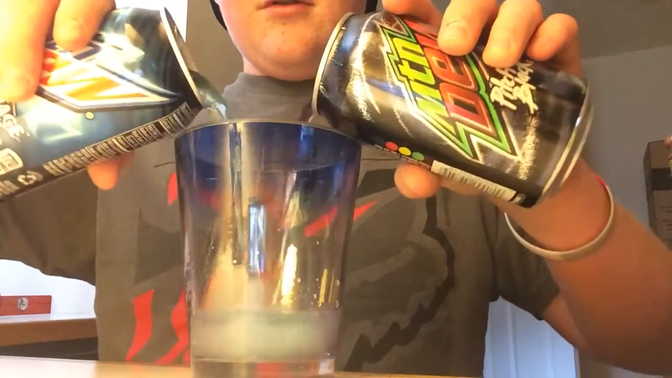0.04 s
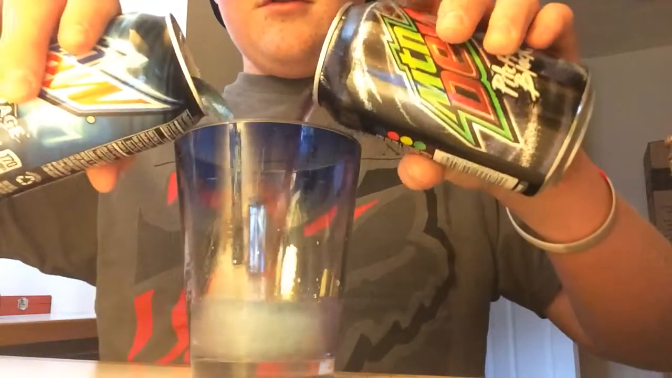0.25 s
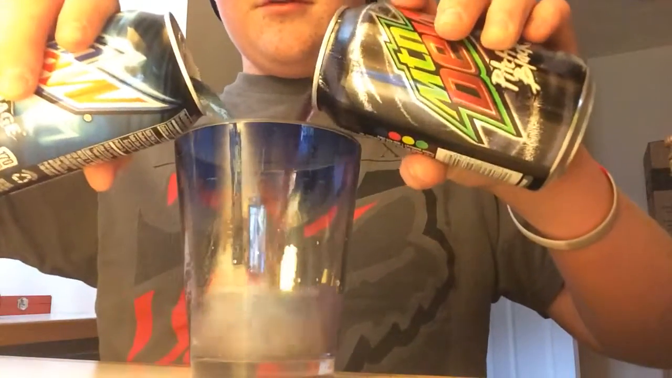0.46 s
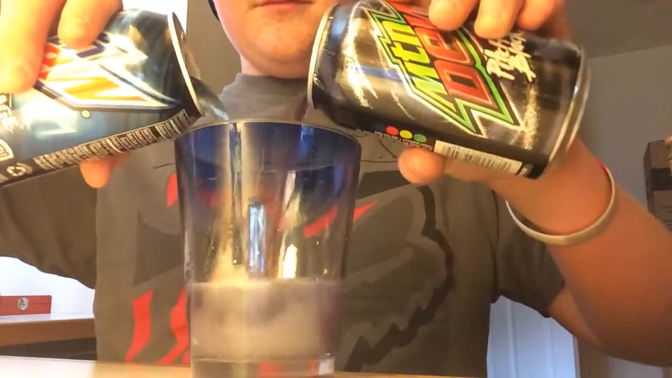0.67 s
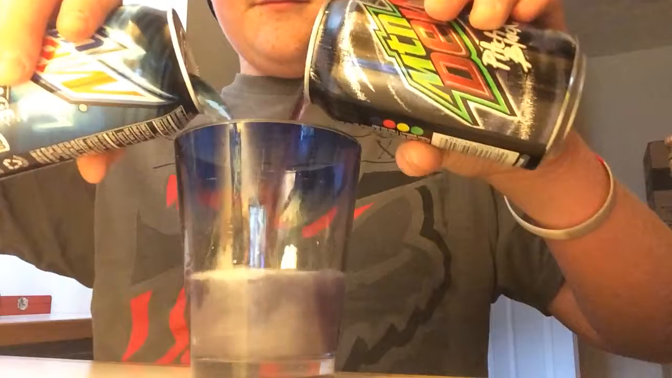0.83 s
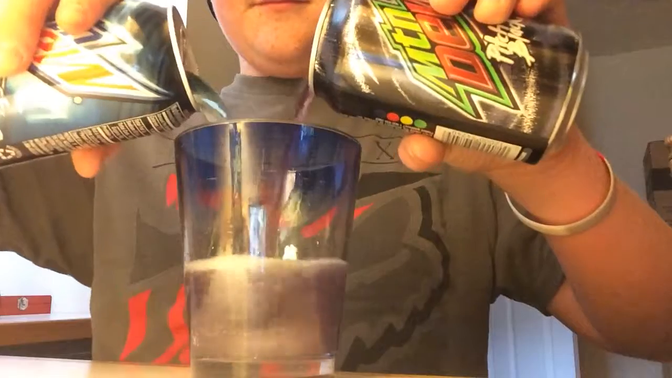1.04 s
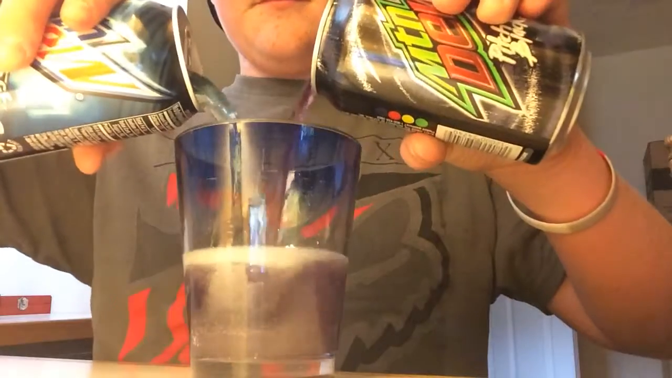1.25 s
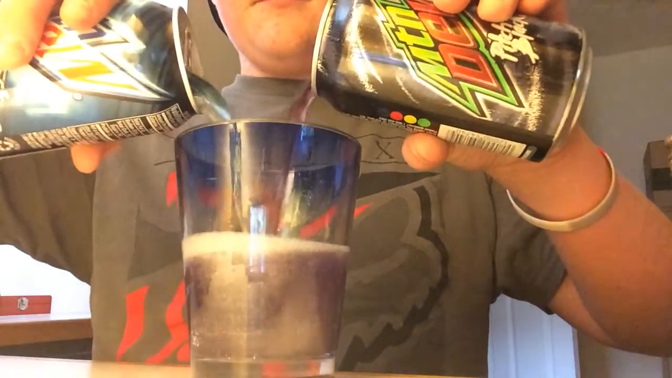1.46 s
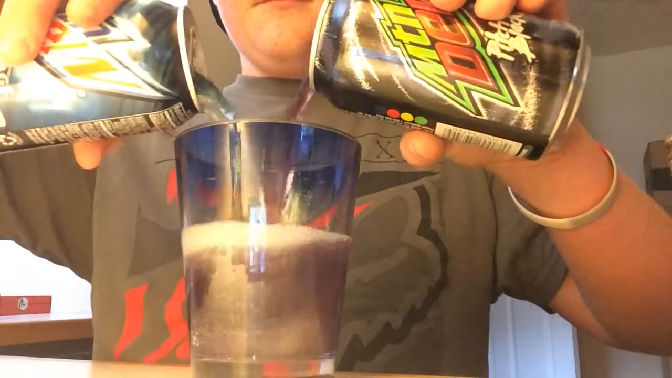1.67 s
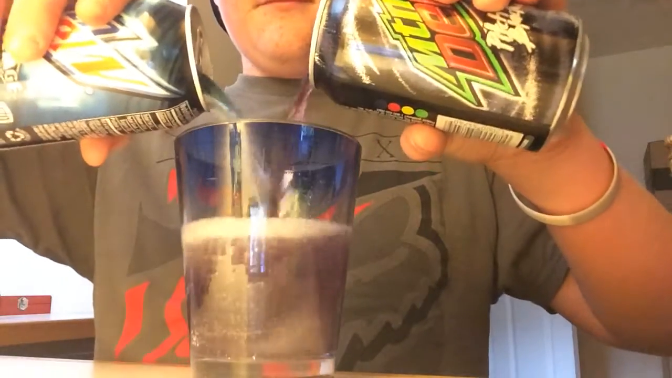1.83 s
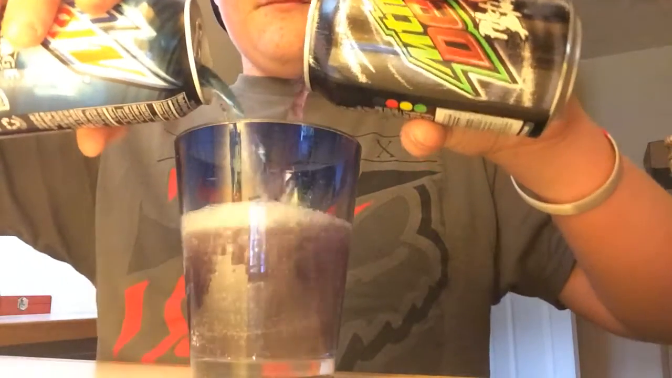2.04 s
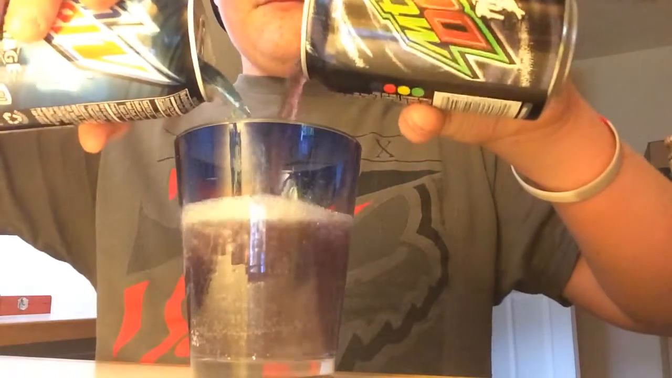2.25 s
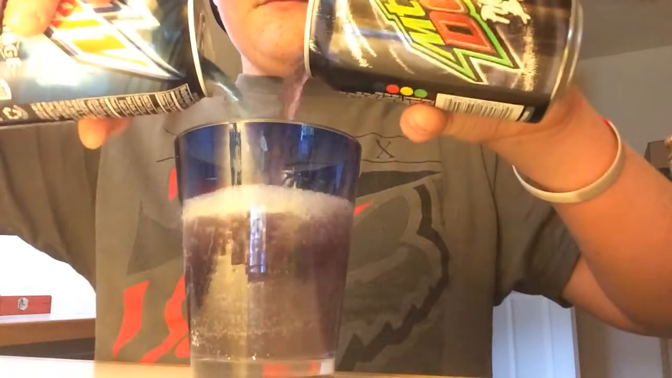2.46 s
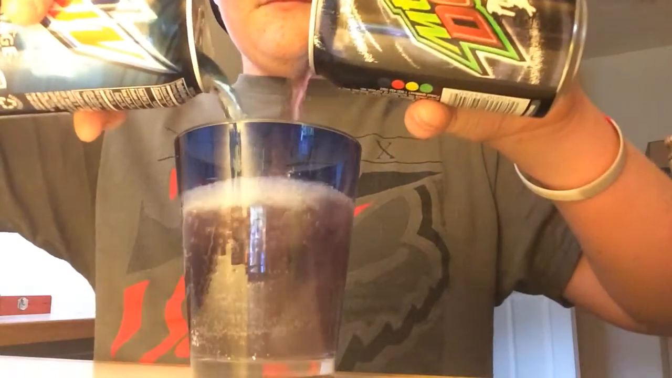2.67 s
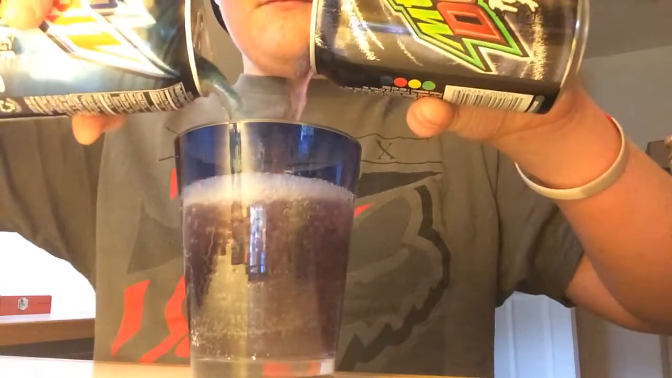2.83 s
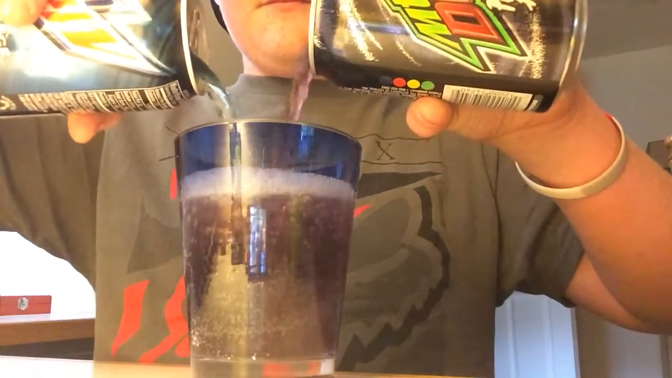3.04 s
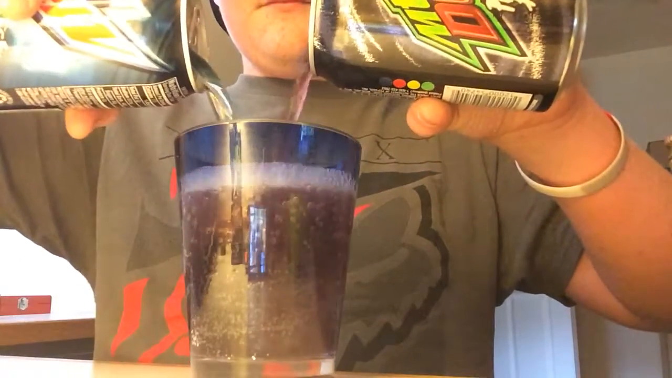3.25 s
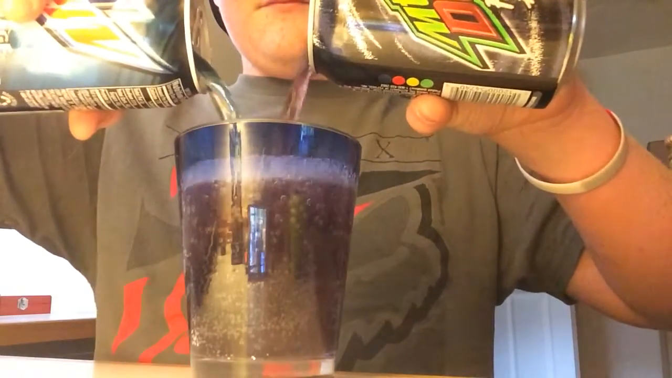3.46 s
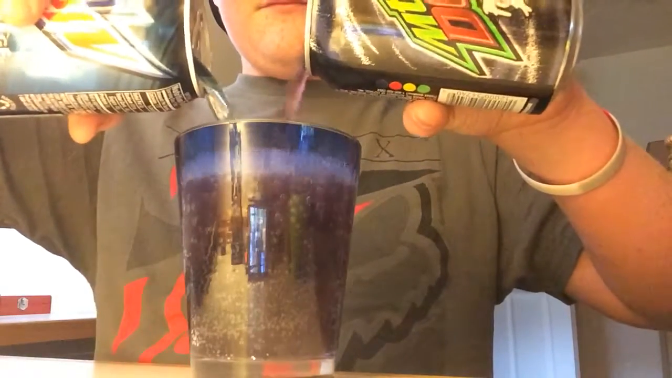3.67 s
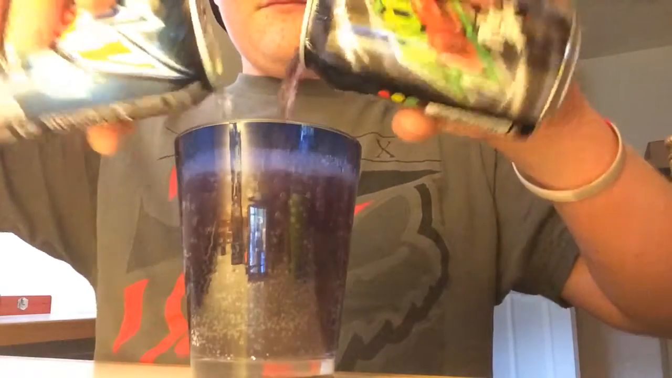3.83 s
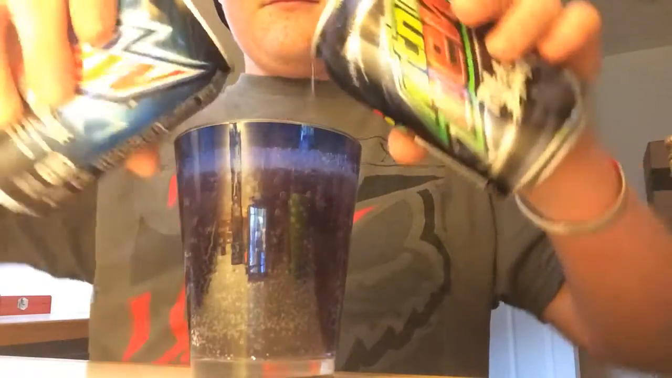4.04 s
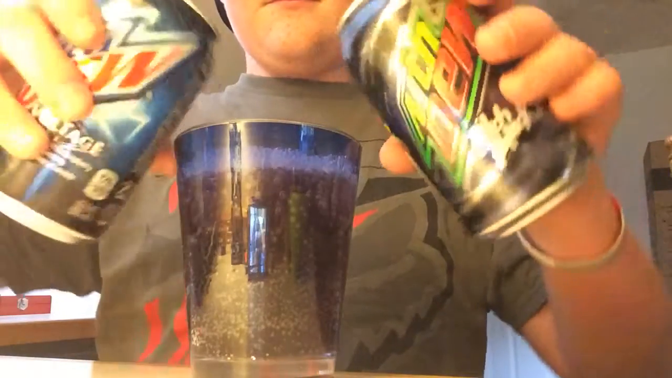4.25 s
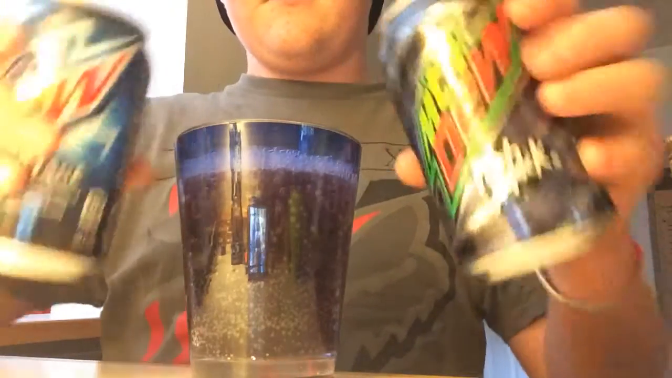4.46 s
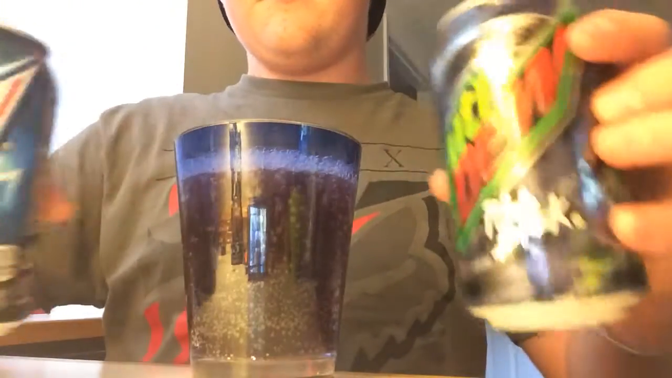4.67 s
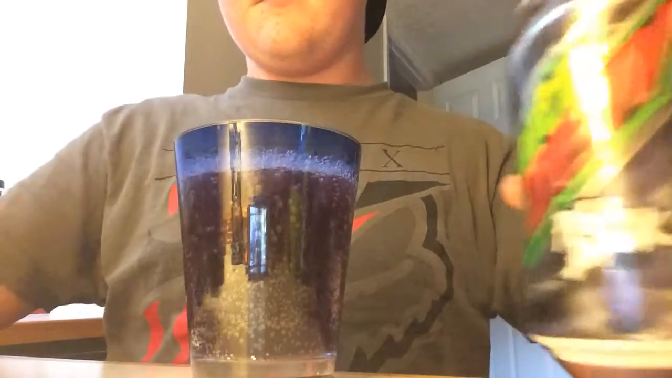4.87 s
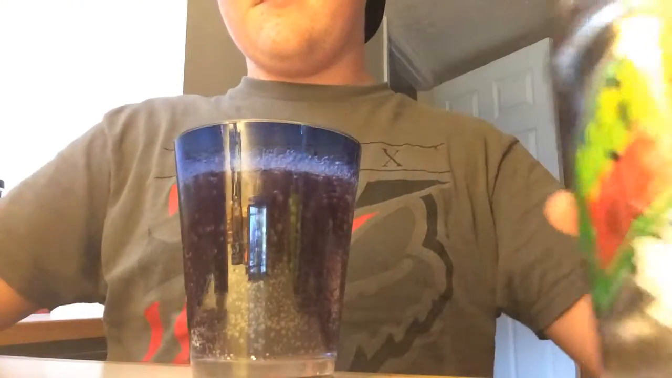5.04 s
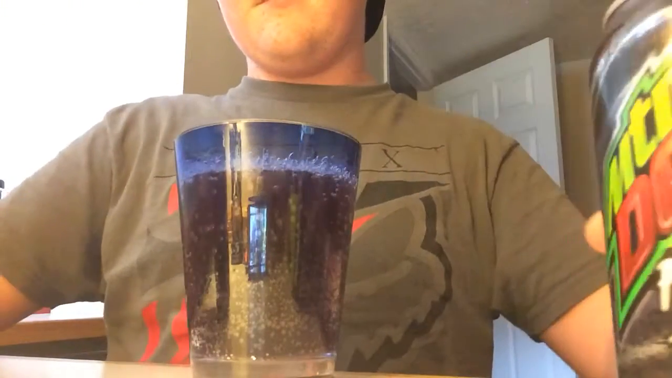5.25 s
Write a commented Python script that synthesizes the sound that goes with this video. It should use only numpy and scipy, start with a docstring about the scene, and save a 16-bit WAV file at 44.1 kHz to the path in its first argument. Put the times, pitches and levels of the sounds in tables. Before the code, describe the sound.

A small microphone sits close to a tall glass on a table in a quiet indoor room with a low, faintly humming rumble. From the start, soda pours from two cans: a loud wet plop and splash, then a lively stream of hollow bubbles whose pitch rises over the first second or so. Bright spray and crackling foam hiss build, strongest around 0.75 seconds, then settle slowly. Distinct plops are frequent until about 1.3 seconds, then sparse. Soft low gulps of air pulse around 1 second, from 1.9 to 2.4, and from 3 to 3.6. The pour thins to a light trickle, breaking into drips near 4 and stopping by 4.3. Only delicate fizz remains, with small thin-metal ticks from 4.5 to 5.1. At about 5.17 the cans slam down: a very loud, hard, woody knock with a tight clatter of bounces, a smaller one at 5.3, and brief room reverberation.

```python
"""A quiet room, a small microphone close to a tall glass on a table: soda from two cans runs into the glass.
Swarms of damped sines are the bubbles ringing the air above the liquid, their pitch rising as the glass fills.
The cans gulp air in low pushes, foam crackles in short grains on a hiss, and puffs of noise are drips and
thin cans ticking in the hands. Both cans are set down hard: pushes, cracks and ringing table modes."""
import sys
import numpy as np
from scipy import signal
from scipy.fft import rfft, irfft, next_fast_len
from scipy.io import wavfile
from scipy.ndimage import uniform_filter1d, map_coordinates

SR = 44100
rng = np.random.default_rng(int(sys.argv[2]) if len(sys.argv) > 2 else 0)


def wav_out(sig):
    """Save sig, one row per channel (or a flat mono array), as 16-bit PCM at SR to the path in sys.argv[1]."""
    wavfile.write(sys.argv[1], SR, np.round(np.clip(np.atleast_2d(sig).T, -1, 1) * 32767).astype(np.int16))


N = 233931
TIME = np.arange(N) / SR  # s


def amp(db):
    """Amplitude factor of a level in dB."""
    return 10 ** (np.asarray(db) / 20)


def unit(x):
    """x scaled to an rms of 1."""
    return x / np.sqrt(np.mean(x ** 2) + 1e-20)


def along(points, hz):
    """Values read between (Hz, value) points on a log frequency axis."""
    point_hz, value = np.transpose(points)
    return np.interp(np.log(hz + 1), np.log(point_hz + 1), value)


def curves(rows):
    """One value per sample for each column after the time."""
    time_s, *columns = np.transpose(rows)
    return [np.interp(TIME, time_s, column) for column in columns]


def wobble(rate):
    """A smooth random curve with rate knots a second."""
    knots = rng.standard_normal(int(N * rate / SR) + 4)
    return map_coordinates(knots, [TIME * rate])


def filtered(x, response):
    """x with its spectrum multiplied by a response of frequency."""
    size = next_fast_len(len(x) + 8192)
    spectrum = rfft(x, size) * response(np.fft.rfftfreq(size, 1 / SR))
    return irfft(spectrum, size)[:len(x)]


def rush(spectrum, patchy_db):
    """Coloured noise of rms 1 with patches of random gain in time and frequency."""
    z = signal.stft(rng.standard_normal(N), nperseg=512)[2]
    field = uniform_filter1d(rng.standard_normal(z.shape), 6, 0)
    field = uniform_filter1d(field, 8, 1)
    patchy = signal.istft(z * amp(patchy_db * unit(field)), nperseg=512)[1][:N]
    return unit(filtered(patchy, lambda hz: amp(along(spectrum, hz))))


def bubbles(s, gain, hz, t60, rise, swell, size, bend):
    """Damped sines that swell over a short onset and climb in pitch; bend above 1 holds, then drops fast."""
    t = np.arange(size) / SR
    hz, t60, gain = (np.asarray(v)[:, None] for v in (hz, t60, gain))
    onset = 1 - np.exp(-(t * hz / swell) ** 2)  # swell is in cycles
    shape = onset * amp(-60 * (t / t60) ** bend)
    shape *= gain / shape.max(axis=1, keepdims=True)
    wave = shape * np.sin(2 * np.pi * hz * t * (1 + rise * t / t60))
    at = np.round(np.asarray(s) * SR).astype(int)[:, None] + np.arange(size)
    return np.bincount(at.ravel(), wave.ravel(), N + size)[:N]


def swarm(centre_hz, spread, cycles, scatter_db, count, size):
    """Many bubbles at random moments, rms 1 together; a few are much louder than the rest."""
    at = rng.integers(0, N - 1, count)
    hz = np.clip(centre_hz[at] * np.exp(spread * rng.standard_normal(count)), 100, 16000)
    gain = amp(scatter_db * np.minimum(rng.exponential(size=count), 4))
    ringing = bubbles(at / SR, gain, hz, cycles / hz, rise=0.043, swell=0.59, size=size, bend=1.05)
    return unit(ringing)


# cross modes of the glass: pitch_hz [Hz], width_hz [Hz], lift_db [dB]
GLASS_MODES = [(2860, 100, 7.5), (3800, 59, 7.5), (4390, 130, 5), (7600, 260, 2)]


def in_glass(x):
    """The glass lifts a few resonant bands of whatever sounds inside it."""
    def lift(f):
        return amp(sum(db / (1 + (2 * (f - hz) / width) ** 2) for hz, width, db in GLASS_MODES))
    return filtered(x, lift)


# the streams over time: time_s [s], splash_db [dB], spray_db [dB], spray_hz (pitch of the spray drops) [Hz]
POUR_COURSE = [(0, -41, -51.5, 2560), (.07, -48, -53, 2480), (.15, -62, -53.5, 2770), (.3, -52, -56, 2810),
               (.5, -50, -60, 2870), (1, -53, -64, 2670), (2.1, -57.5, -68, 2040), (2.5, -61.5, -58, 1510),
               (3, -66, -64.5, 1730), (3.4, -66, -57, 1740), (3.8, -66, -61, 1970),
               (4.07, -62, -58.5, 2230), (4.3, -83, -65, 2300)]
# large bubbles trapped by the streams: start_s [s], peak_db [dB], pitch_hz [Hz],
# decay_cycles (cycles until 60 dB are lost) [cycles]
LARGE_BUBBLES = [(0.014, -22.5, 863, 11), (0.041, -21, 792, 14.5), (0.307, -33, 1040, 14),
                 (0.401, -35, 1000, 15), (0.43, -29.5, 945, 20), (0.458, -28.5, 938, 26),
                 (0.477, -34.5, 950, 17), (0.51, -38, 995, 19), (0.555, -30.5, 950, 24),
                 (0.597, -35.5, 927, 14), (0.649, -30.5, 960, 30), (0.705, -39, 930, 18),
                 (0.729, -25.5, 1000, 15.5), (0.787, -35.5, 940, 23), (0.89, -38, 947, 17),
                 (0.936, -25, 980, 13), (0.982, -26, 975, 14), (1.104, -37, 1040, 15),
                 (1.133, -36.5, 1035, 12), (1.18, -31.5, 990, 17), (1.29, -38, 965, 18),
                 (1.592, -41.5, 965, 21), (1.902, -37, 1130, 10), (2.047, -35, 1060, 14),
                 (3.47, -44, 990, 15), (3.602, -41, 1100, 15)]
# colour of the spray's hiss: pitch_hz [Hz], level_db (relative, per Hz) [dB]
SPRAY_COLOUR = [(900, -45), (1300, 4), (3000, -2), (5000, -34), (7000, -13)]
# the air column's pitch climbs and levels off as the glass fills
COLUMN_START_HZ, COLUMN_FULL_HZ, FILL_S = 814, 1069, 0.69


def pour():
    """Small bubbles ring near the air column's pitch, others churn lower, and spray adds bright drops on a hiss."""
    splash_db, spray_db, spray_hz = curves(POUR_COURSE)
    column_hz = COLUMN_FULL_HZ - (COLUMN_FULL_HZ - COLUMN_START_HZ) * np.exp(-TIME / FILL_S)
    flowing = np.clip((POUR_COURSE[-1][0] - TIME) / 0.16, 0, 1)  # fades out as the pour ends

    small = swarm(column_hz, spread=.05, cycles=18, scatter_db=2.8, count=1400, size=1200)
    splash = amp(splash_db) * small
    drops = swarm(spray_hz, spread=.27, cycles=20.6, scatter_db=4.0, count=2200, size=600)
    large = swarm(.5 * column_hz, spread=0.34, cycles=10.7, scatter_db=3.0, count=1200, size=1200)
    churn = amp(splash_db - 7.5) * large
    hiss = rush(SPRAY_COLOUR, patchy_db=1.5)
    spray = amp(spray_db + 3.4 * wobble(9.14)) * in_glass(0.82 * drops + 0.29 * hiss)

    s, db, hz, cycles = np.transpose(LARGE_BUBBLES)
    t60 = cycles / hz
    plops = bubbles(s, amp(db), hz, t60, rise=0.02, swell=0.9, size=2000, bend=1.75)
    # a brighter overtone answers briefly as each bubble pinches off
    pinch = bubbles(s, amp(db - 17), 2.52 * hz, 0.35 * t60, rise=0.058, swell=0.85, size=600, bend=1.15)
    # the neck snaps shut
    snap = bubbles(s, amp(db - 8.5), 1.44 * hz, 0.51 * t60, rise=.05, swell=0.29, size=600, bend=1.1)

    near = snap + flowing * (splash + churn + spray) + plops + pinch
    echo = np.pad(near, (round(0.012 * SR), 0))[:N]  # a wall two metres off answers once
    return near + amp(-12) * echo


# colour of the fine foam hiss: pitch_hz [Hz], level_db (relative, per Hz) [dB]
FIZZ_COLOUR = [(2060, -3), (3500, 0.5), (3820, -1.5), (4840, -1.5), (12500, -4), (15500, -10)]
FOAM_START_DB, FOAM_PEAK_DB, FOAM_PEAK_S = -63.5, -60.5, 0.75  # the fizz builds up,
FOAM_REST_DB, FOAM_SETTLE_S = -67.5, 0.88  # then settles
LAST_DROPS_S, LAST_DROPS_WIDTH_S, LAST_DROPS_DB = 4.01, 0.13, 2  # it flares as the streams break up


def fizz():
    """Tiny foam cells burst: few-cycle grains on a fine hiss, coloured by the glass."""
    settling_db = FOAM_REST_DB + (FOAM_PEAK_DB - FOAM_REST_DB) * np.exp((FOAM_PEAK_S - TIME) / FOAM_SETTLE_S)
    building_db = FOAM_START_DB + (FOAM_PEAK_DB - FOAM_START_DB) * TIME / FOAM_PEAK_S
    fizz_db = np.where(TIME < FOAM_PEAK_S, building_db, settling_db)
    fizz_db += LAST_DROPS_DB * np.exp(-((TIME - LAST_DROPS_S) / LAST_DROPS_WIDTH_S) ** 2)
    flicker_db = .5 * wobble(7) + .7 * wobble(25)
    grains = swarm(np.full(N, 9500.), spread=.35, cycles=6, scatter_db=4, count=4000, size=100)
    hiss = rush(FIZZ_COLOUR, patchy_db=2.0)
    return amp(fizz_db + flicker_db) * in_glass(.5 * grains + 1.05 * hiss)


# rumble of the house: pitch_hz [Hz], level_db (relative, per Hz) [dB]
RUMBLE_COLOUR = [(12, -69), (20, -16.5), (113, -6), (149, -13), (188, -6.5), (320, -5.5), (351, -13),
                 (557, -9.5), (597, -13.5), (2280, -22.5), (5000, -35), (6500, -64), (11000, -120)]
# wavering appliance tones: pitch_hz [Hz], width_hz [Hz], level_db [dB]
APPLIANCE_TONES = [(187.6, 6.6, -57.5), (356, 9, -65.5), (134.4, 47, -61)]
HUM_DB = -52  # room rumble


def room_noise():
    """Broad rumble of the house with a few narrow bands of noise that waver like tones."""
    out = amp(HUM_DB + 0.32 * wobble(6.15)) * rush(RUMBLE_COLOUR, patchy_db=1.05)
    for tone_hz, width_hz, db in APPLIANCE_TONES:
        noise = rng.standard_normal(N)
        tone = filtered(noise, lambda f: np.exp(-((f - tone_hz) / width_hz) ** 2))
        out += amp(db) * unit(tone)
    return out


# broad ticks and rubs of the can walls in the hands: start_s [s], level_db [dB], pitch_hz (band centre) [Hz],
# t60_s [s]
CAN_HANDLING = [(0.016, -35, 3180, 0.016), (0.278, -44, 4500, 0.052), (3.929, -45, 3250, 0.028),
                (4.484, -46, 7800, 0.073), (4.709, -37.5, 1520, 0.034), (4.745, -50, 4000, 0.023),
                (4.855, -39.5, 4900, 0.021), (4.944, -52.5, 8950, 0.13), (5.081, -49.5, 5830, 0.022)]
HANDLING_OCTAVES = 1.6
# foam cells and drops bursting at the surface: start_s [s], level_db [dB], pitch_hz (band centre) [Hz]
SURFACE_BURSTS = [(.536, -45, 12000), (.649, -36.5, 10700), (0.783, -50, 7750), (1.03, -47, 10900),
                  (1.288, -46, 10100), (1.576, -45.5, 9100), (1.902, -41, 12100), (1.902, -40, 2210),
                  (3.277, -42, 1810), (3.35, -36, 1680), (3.748, -37, 1820), (3.878, -44, 1900),
                  (4.002, -40, 2460)]
BURST_T60_S, BURST_OCTAVES = 0.012, 0.45
# single small drops that ring with a pitch: start_s [s], level_db [dB], pitch_hz [Hz]
SINGLE_DRIPS = [(3.002, -44.5, 3800), (3.918, -43, 2000), (4.024, -48, 3230), (4.035, -47.5, 8900),
                (4.062, -50, 2900)]
DRIP_T60_S, DRIP_OCTAVES = .018, 0.1


def ticks():
    """Short puffs of noise in a band around each centre: broad handling, narrow bursts, pitched drips."""
    out, t = np.zeros(N + SR), np.arange(6000) / SR
    rows = [(*row, BURST_T60_S, BURST_OCTAVES) for row in SURFACE_BURSTS]
    rows += [(*row, HANDLING_OCTAVES) for row in CAN_HANDLING]
    rows += [(*row, DRIP_T60_S, DRIP_OCTAVES) for row in SINGLE_DRIPS]
    for s, db, centre_hz, t60, octaves in rows:
        def band(hz):
            return amp(-6 * (np.log2((hz + 1) / centre_hz) / octaves) ** 2)
        noise = unit(filtered(rng.standard_normal(len(t)), band))
        swell = 1 - np.exp(-t / (.06 * t60))
        out[round(s * SR):][:len(t)] += amp(db - 60 * t / t60) * swell * noise
    return out[:N]


# air gulping into the cans: start_s [s], peak_db [dB]
AIR_GULPS = [(1.038, -41.5), (1.21, -46), (1.917, -46), (2.088, -42.5), (2.194, -36), (2.294, -44),
             (2.387, -43), (3.034, -40), (3.138, -39), (3.243, -40.5), (3.55, -42)]
GULP_HZ = 121


def gulps():
    """Each air pocket entering a can is one low push: an inverted sine that dies within a few cycles."""
    s, db = np.transpose(AIR_GULPS)
    hz = np.full(len(s), float(GULP_HZ))
    return -bubbles(s, amp(db), hz, 3.6 / hz, rise=0.072, swell=0.95, size=3000, bend=0.78)


# can rims meeting the table, with bounces: push_s (peak of the push) [s], level_db [dB],
# brightness_db (level of the short crack) [dB]
CAN_KNOCKS = [(5.159, -28, -7), (5.1702, 2.5, -0.5), (5.1762, -9, -11), (5.1817, -3, -1), (5.186, 1, -21),
              (5.188, -6, 12.5), (5.1932, -7.5, -22), (5.2048, -11, -13), (5.2978, -3, -9.5)]
# modes of table top and can: pitch_hz [Hz], level_db [dB], t60_s [s]
TABLE_MODES = [(128, -9, 0.13), (180, -6.5, 0.12), (264, -4.5, 0.099), (352, -20, 0.22), (434, -6.5, 0.12),
               (540, -1.5, 0.11), (648, -1, 0.076), (696, -8.5, 0.075), (961, -5.5, 0.071),
               (1220, -29, 0.04), (1369, -7.5, 0.095), (2225, -16, 0.15)]
# colour of the crack: pitch_hz [Hz], level_db (relative, per Hz) [dB]
CRACK_COLOUR = [(300, -4), (1000, 8), (2200, 4.5), (4500, -5.5), (7000, -18), (15000, -35.5)]


def knocks():
    """Each contact: a push with the board springing back, a crack with a rattling tail, and the table's modes."""
    out, t = np.zeros(N + SR), np.arange(SR // 5) / SR
    hz, level_db, ring_s = (v[:, None] for v in np.transpose(TABLE_MODES))
    lead = .0015  # the push peaks this many seconds after first touch
    for s, db, bright_db in CAN_KNOCKS:
        late = (t - lead) / 0.00058
        push = (1 - 2 * late ** 2) * np.exp(-late ** 2)  # no net displacement of air

        # every contact excites the modes in a different balance
        strength = amp(level_db + rng.normal(0, 3.7, hz.shape) - 60 * t / ring_s)
        ring = (strength * np.sin(2 * np.pi * hz * t)).sum(axis=0)
        ring *= 1 - np.exp(-(t / 0.0027) ** 2)

        noise = unit(filtered(rng.standard_normal(len(t)), lambda f: amp(along(CRACK_COLOUR, f))))
        snap = amp(bright_db - 60 * t / 0.011)
        rattle = amp(-10.5 - 60 * t / 0.079)
        crack = noise * (snap + rattle) * np.clip((t - .0007) / 0.00022, 0, 1)

        contact = 0.73 * push + amp(-16.5) * ring + amp(-11.5) * crack
        out[round((s - lead) * SR):][:len(t)] += amp(db) * contact
    return out[:N]


# how long the room's answer lasts: pitch_hz [Hz], t60_s [s]
WALL_DECAY = [(150, .4), (1000, 0.36), (4000, 0.16), (12000, 0.33)]


def walls(x, level_db):
    """Adds the room's answer, a noise tail in which each frequency dies at its own speed."""
    hz, t, z = signal.stft(rng.standard_normal(SR // 2), SR, nperseg=256)
    decay = amp(-60 * t / along(WALL_DECAY, hz)[:, None])
    tail = signal.istft(z * decay, SR, nperseg=256)[1]
    delayed = np.pad(x, (260, 0))  # samples before the first answer
    return x + amp(level_db) * signal.fftconvolve(delayed, tail / np.linalg.norm(tail))[:N]


def scene():
    """Glass, hands and table each reach the microphone with their own share of room; fizz and room noise lie dry."""
    glass = walls(pour() + gulps(), level_db=-16.5)
    hands = walls(ticks(), level_db=-7.0)
    table = walls(knocks(), level_db=-12)
    return (glass + hands + table + fizz() + room_noise())[None]


TOP_HZ = 15500  # band limit of the microphone


def record(dry):
    """A small capsule loses the deep bass, rounds off the loudest peaks and keeps nothing above its band limit."""
    x = filtered(dry[0], lambda hz: (1j * hz / (30 + 1j * hz)) ** 2)
    x = x / (1 + np.abs(x / .97) ** 6) ** (1 / 6)
    return filtered(x, lambda hz: hz < TOP_HZ)[None]


dry = scene()
out = record(dry)
wav_out(out)
```